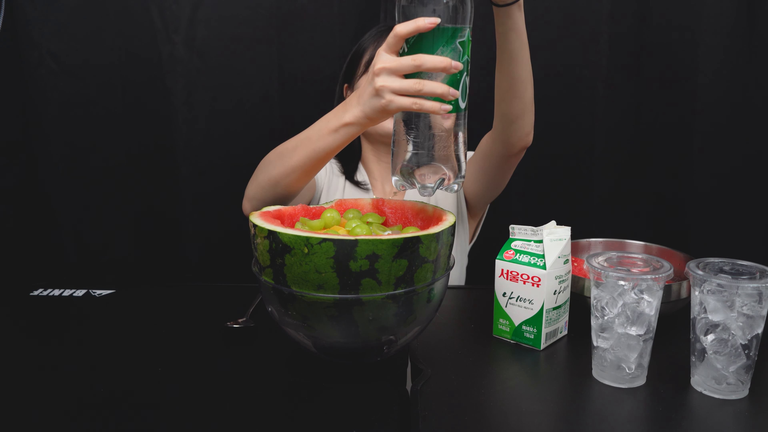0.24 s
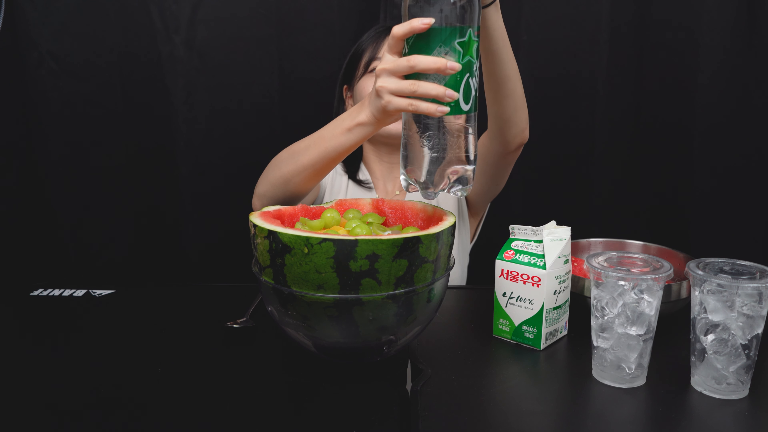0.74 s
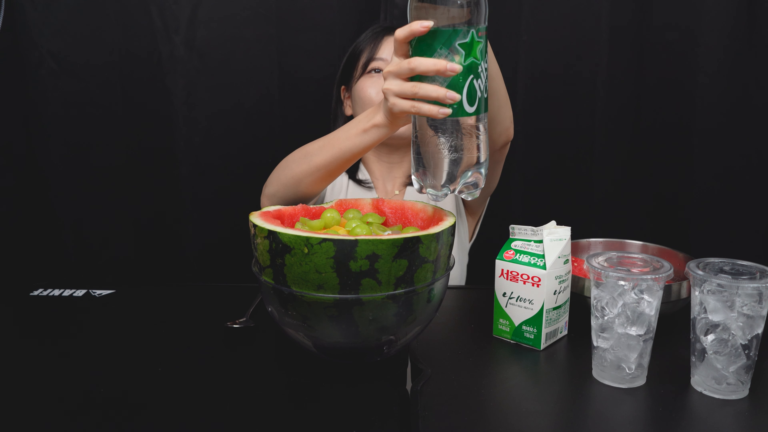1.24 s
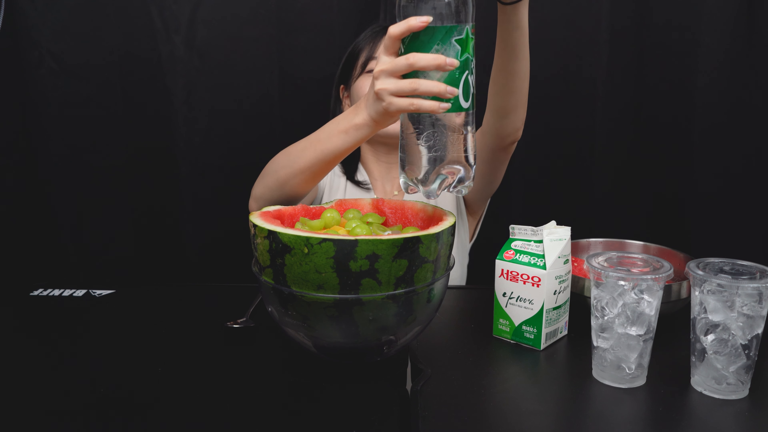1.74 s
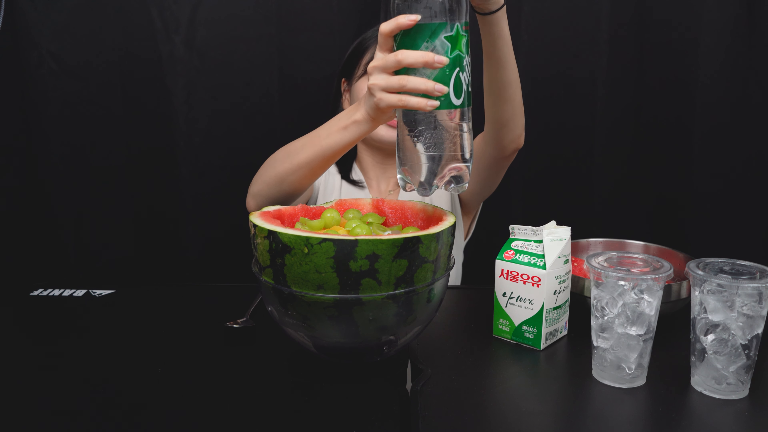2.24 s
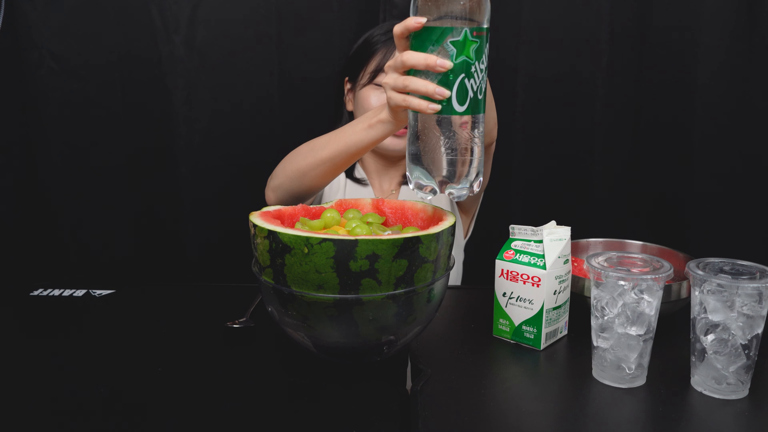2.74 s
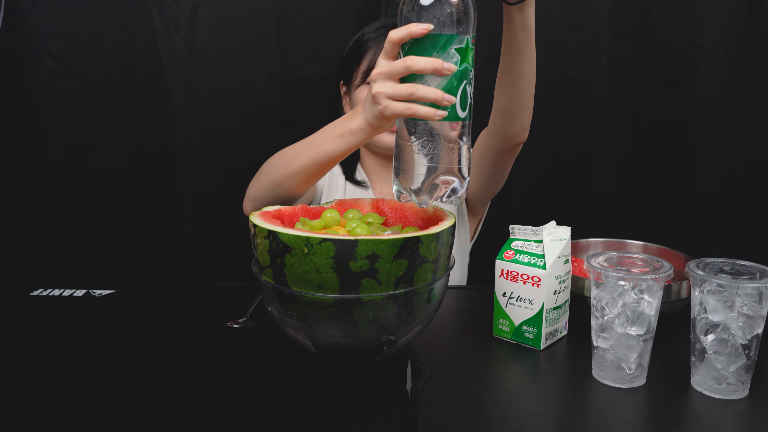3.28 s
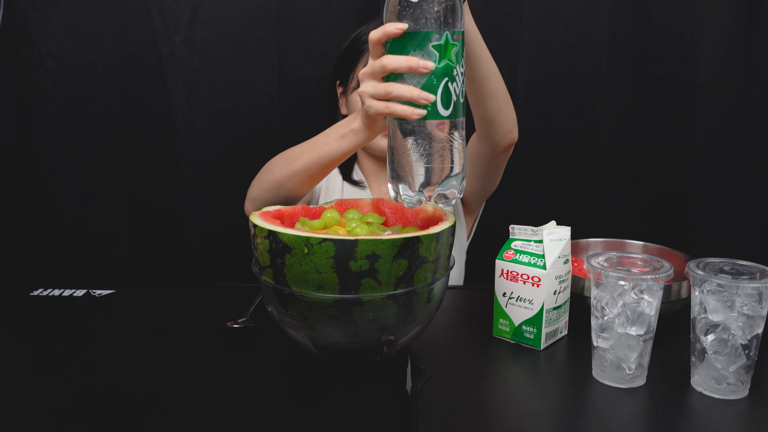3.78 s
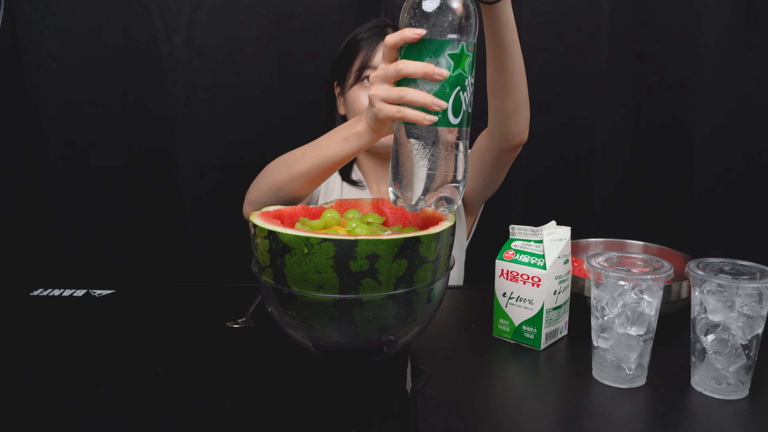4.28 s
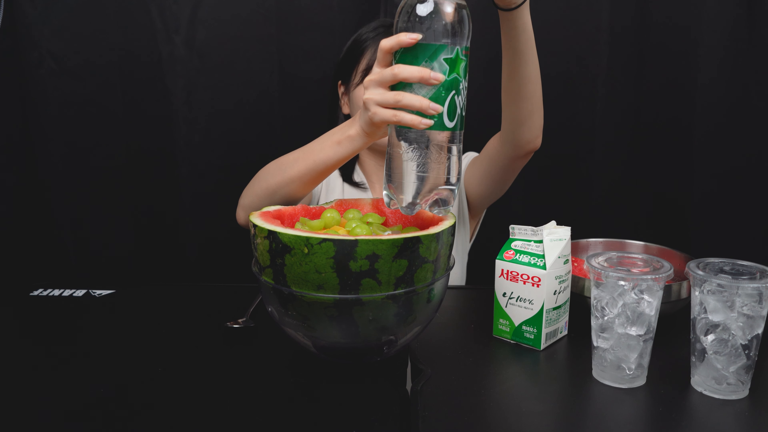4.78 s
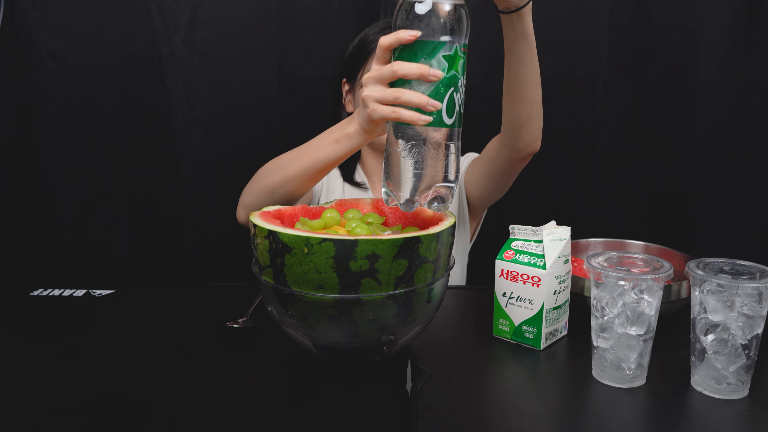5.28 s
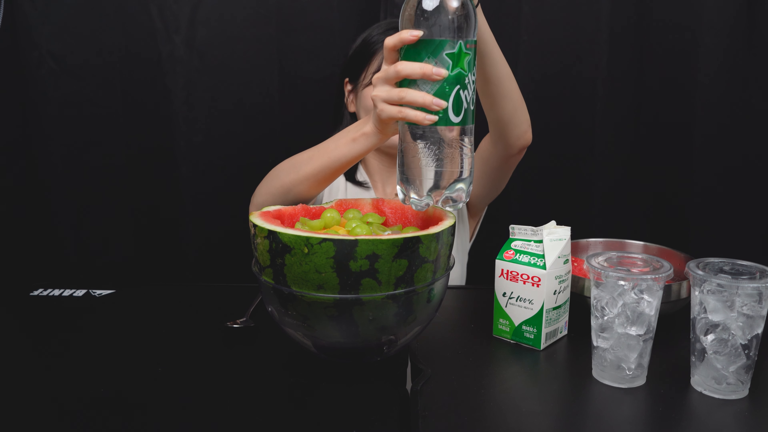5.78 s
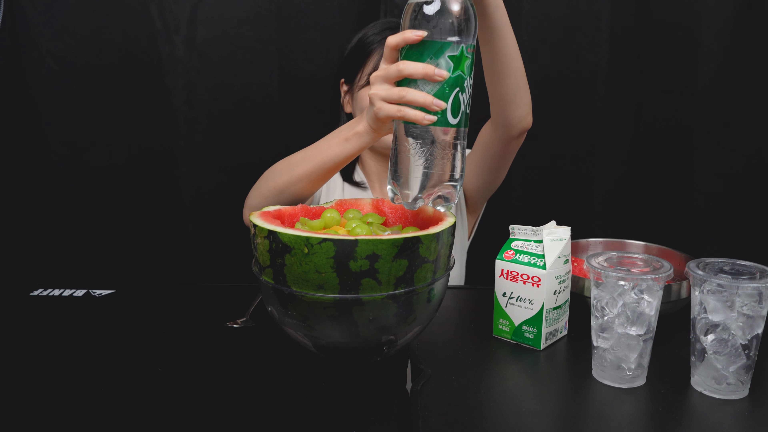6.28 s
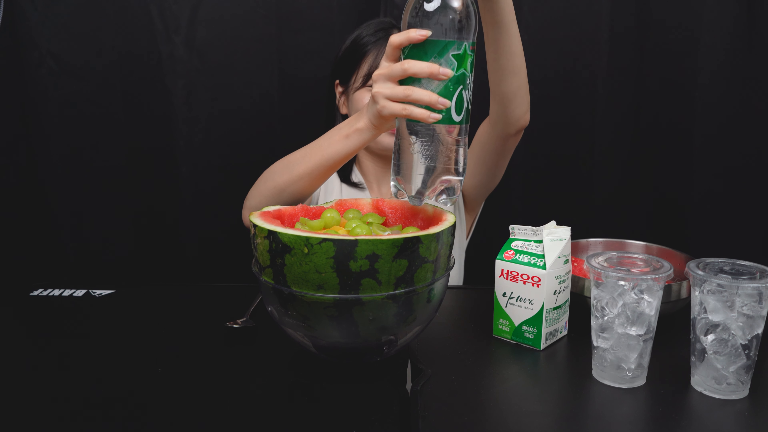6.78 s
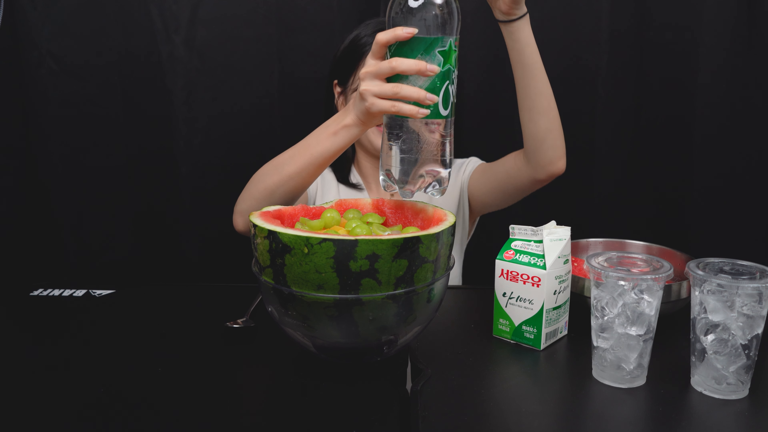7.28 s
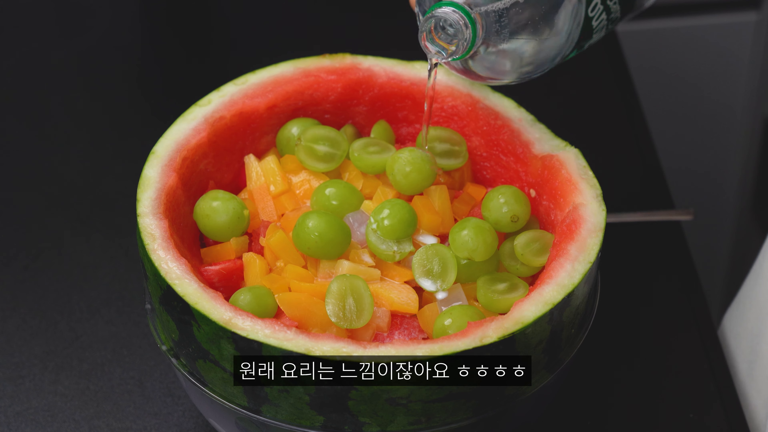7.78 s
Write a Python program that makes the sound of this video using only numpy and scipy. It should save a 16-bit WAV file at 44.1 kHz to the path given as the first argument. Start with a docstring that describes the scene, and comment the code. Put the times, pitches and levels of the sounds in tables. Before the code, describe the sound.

A plastic soda bottle is cracked open close up: a short gas hiss, sharp cap snaps, a dull table thump, then two last plastic clicks.

```python
"""In a quiet room, close to a microphone, a plastic soda bottle is twisted open.
Gas hisses through the thread as turbulent noise whose colour follows the gap; the cap ring snaps
in short bursts that excite resonances; fingers rub in stuttering noise and tap in softer bursts.
Dull bumps ring the modes of the table as decaying sines, and the air in the neck gives a brief
rising note as the cap lifts off. A faint hush of shaped noise lies beneath, with sparse echoes."""
import sys
import numpy as np
from scipy import signal
from scipy.fft import rfft, irfft
from scipy.io import wavfile
from scipy.ndimage import uniform_filter1d

SR = 44100
rng = np.random.default_rng(int(sys.argv[2]) if len(sys.argv) > 2 else 0)


def generate_wav(sig):
    """Save sig (samples, or channels by samples) to the path in sys.argv[1] as 16-bit PCM at SR."""
    pcm = np.round(np.clip(np.atleast_2d(sig).T, -1, 1) * 32767).astype(np.int16)
    wavfile.write(sys.argv[1], SR, pcm)


N = 354123

# Room hush, relative spectrum: (frequency [Hz], density [dB per Hz])
AIR_SPECTRUM = [(15, -38.5), (25, -10), (72, -8.5), (102, -23.5), (137, -7.5), (263, -9.5), (326, -15),
                (439, -3.5), (489, -13), (818, -15), (1230, -15), (1700, -18), (3820, -23.5), (6380, -22),
                (16000, -25.5)]
# Resonances in the hush, before 15 Hz more width and a factor 0.56:
# (frequency [Hz], width [Hz], gain [dB])
HUSH_RESONANCES = [(174, 210, 3.5), (483, 19, 3), (1310, 190, -11)]
# Hiss of opposite sign in left and right: (frequency [Hz], density [dB per Hz])
CHANNEL_SPECTRUM = [(15, -32.5), (25, -5), (175, -6), (309, -5.5), (2410, -2.5), (14800, -3),
                    (16000, -11.5)]
AIR_DB, CHANNEL_DB = -68, -74.5  # rms levels

# Decay of the room's echoes: (frequency [Hz], t60 [s])
ROOM_DECAY = [(250, 0.4), (1000, 0.62), (2000, 0.33), (4000, 0.41), (7000, 0.31), (10000, 0.18),
              (15000, 0.18)]

# Modes of the table, ringing freely: (frequency [Hz], level [dB], t60 [s])
TABLE_MODES = [(39, -3, 1.0), (58, 0, .38), (80, -2, .2), (110, -3, .12), (150, -5, .25), (200, -6, .3),
               (221, -3, .38), (290, -10, .22), (350, -7, .2), (409, -5, .2), (450, -6, .16)]
# Bumps through the table, peak before the low-pass:
# (time [s], peak [dB], favoured pitch [Hz], selectivity [dB per octave squared])
TABLE_BUMPS = [(.211, -44, 90.5, 5.5), (.249, -53.5, 69, 0.5), (1.452, -51, 62, -2), (1.603, -45, 107, 24),
               (1.937, -56, 44, 1.1), (2.091, -46, 66, 2), (2.21, -42, 57, 1.3), (2.432, -42.5, 103, 10.5),
               (2.554, -47.5, 91, 6), (2.602, -43, 101, 15.5), (2.747, -54, 78, 18), (2.897, -44, 60, 1),
               (3.388, -49, 68.6, 30), (3.441, -56, 60, 16), (3.571, -49, 52, 21), (3.677, -51, 126, 4),
               (3.748, -37.5, 119, 9), (3.806, -14.5, 90, 6.5), (3.822, -12.5, 63, 5), (3.87, -13, 203, 7),
               (3.888, -16.5, 80, 7), (3.904, -18, 158, 5), (3.965, -15.5, 111, 10.5),
               (3.974, -17.5, 88.2, 4), (3.975, -26, 39, 19), (3.983, -27.5, 220, 37),
               (4.063, -30.5, 199, 29), (4.11, -38, 149, 21.5), (4.314, -57, 199, 26),
               (4.854, -59, 207, 18), (5.722, -42.5, 392, 5.5), (6.88, -50, 110, 18)]
# Share of the free ring time, and its growth per dB of selectivity: purer bumps are damped less
RING_SHARE, RING_SHARE_PER_DB = 0.26, 0.0231

# Fingers sliding on the bottle: (start [s], rise [s], hold [s], fade [s], level [dB],
# wall resonance [Hz], treble relative to wall [dB])
FINGER_SLIDES = [(0.284, .008, 0.02, 0.025, -62, 4670, -20), (1.201, 0.0047, 0.053, 0.065, -60, 2070, -12),
                 (1.584, 0.015, 0.015, 0.13, -55, 2350, -2.5), (1.72, .02, 0.096, .04, -71.5, 2320, -10),
                 (2.45, .004, 0.021, 0.073, -68, 2240, -13), (2.534, 0.013, 0.037, 0.013, -61.5, 2280, -8),
                 (2.921, .004, .06, .04, -66, 3890, -8.5), (3.053, 0.022, 0.024, 0.24, -62, 2310, 0.5),
                 (3.196, 0.03, 0.13, .08, -69, 2450, 7.5), (3.415, 0.03, .01, 0.046, -73.5, 2480, 9.5),
                 (4.093, 0.029, 0.054, .06, -59, 2090, -2), (6.051, 0.0044, 0.051, .02, -57.5, 3900, -8),
                 (6.179, .02, 0.012, 0.039, -57.5, 3480, 3), (6.31, .035, 0.052, .03, -73.5, 4330, -19),
                 (6.4, 0.032, .025, .055, -62, 3550, -20), (6.915, 0.016, 0.014, 0.029, -44, 2660, -27),
                 (7.241, 0.0028, .006, 0.039, -63, 3540, -18.5),
                 (7.818, 0.0075, .01, .05, -70, 6100, -18.5)]
SLIDE_EDGE_DB = -20  # relative level at the start of the rise and the end of the fade

# Fingertips tapping the bottle wall: (time [s], peak [dB], centre [Hz])
FINGER_TAPS = [(1.257, -46.5, 1320), (1.585, -47, 1500), (1.453, -35, 797), (2.096, -39, 816),
               (2.111, -26, 1100), (2.156, -42.5, 743), (2.209, -33, 778), (2.433, -32.5, 767),
               (2.892, -32, 1300), (2.907, -26.5, 830), (3.807, -33, 980), (3.826, -30, 762),
               (3.88, -33.5, 743), (3.888, -40, 720), (3.9, -44, 746), (3.963, -40.5, 977),
               (5.991, -44, 1560), (7.205, -49, 1614)]
TAP_ABOVE_DB, TAP_BELOW_DB = -7, 4  # slopes above and below the centre, dB per octave
TAP_MS, TAP_RATTLE_DB = .55, -27  # time scale; splinter peaks come at half of it
TAP_CAP_SHARE = .2  # a tap on the wall hardly rings the cap

# The loose cap knocks and rings the air in the neck: (time [s], level [dB])
CAP_KNOCKS = [(6.844, -34), (6.888, -45), (6.957, -55.5)]
NECK_S, NECK_LENGTH_S, NECK_T60_S = 6.846, .17, 0.13
NECK_SHUT_HZ, NECK_OPEN_HZ = 317, 520
NECK_LIFT_S, NECK_GLIDE_S = .065, 0.018  # midpoint and time scale of the glide

# Snaps of the cap and its ring: (time [s], peak [dB], centre [Hz],
# slope above it [dB per octave], slope below it [dB per octave])
CAP_CRACKS = [(0.411, -27, 2820, -5, 6), (1.268, -29.5, 2280, 0, 9), (1.332, -32.5, 2090, -1, 11),
              (1.349, -35.5, 2150, -1.5, 4), (1.612, -28, 2630, 5, 0), (1.539, -50, 3000, -11.5, 7),
              (1.64, -48, 5500, 1, 6), (1.673, -40, 3420, -14, 18), (1.826, -46.5, 3014, -13.5, 8),
              (2.552, -46, 2400, -21, 10.1), (2.596, -8.5, 2190, 3.5, 12), (2.603, 2, 2013, 0, 15),
              (2.74, -5, 3770, -2, 14), (3.643, -8, 5280, -5, 9.5), (3.752, -4.5, 2150, -3, 7.5),
              (3.775, -15, 4280, -14, 9.5), (3.795, -14.5, 3300, -3.5, 13), (3.837, -19, 2250, -3, 9),
              (3.922, -16.5, 2040, -2.2, 16.5), (5.584, -42, 2147, -7, 3), (5.609, -12.5, 2150, -1.5, 12.5),
              (5.637, -3, 3200, -5, 14), (5.672, -8.5, 3240, -3.5, 8.5), (5.7195, -0.5, 3000, -0.5, 0),
              (5.722, 3.8, 2030, -8.5, 15.5), (5.722, -4.5, 1050, -12, 9), (5.872, -23.5, 3480, -11, 9.5),
              (6.035, -29, 4390, -11.5, 10.5), (6.066, -38, 2270, -9, 9), (6.076, -38.5, 2280, -4.5, 7),
              (6.089, -34, 4250, -16, 3), (6.19, -42, 3680, -6.5, -8), (6.841, -20.5, 2980, -10, 4.5),
              (6.845, 3, 2930, -7.5, 4.5), (6.8755, -10.5, 3560, -9.5, 1), (6.886, -21.5, 1910, -11, 2),
              (6.894, -33, 3620, -9, 10), (6.9485, -33, 3500, -21, 6), (6.9578, -31, 2000, -11, 1),
              (7.183, -51, 4130, -5, 12), (7.246, -45, 3640, -17.5, 13)]
# Soft resonances of the cap: (frequency [Hz], width [Hz], gain [dB])
CAP_RESONANCES = [(2170, 200, 6.5), (2800, 300, -4.5), (3560, 470, -12.5), (6900, 1800, 2)]
CRACK_MS, CRACK_RATTLE_DB, RATTLE_S = .6, -29, 0.013  # RATTLE_S: decay to 1/e
RATTLE_HZ, RATTLE_DB_PER_OCTAVE = 2050, -13  # cracks near the cap's main ring rattle it most
THINNING_DB = 0.2  # the bass falls ever faster below the centre, dB per octave squared

# Gas jet over time: (time [s], level [dB], gap opening [0-1])
JET_COURSE = [(0.335, -53, 0.2), (0.409, -39, 0.14), (0.521, -21, 0.44), (0.667, -21.5, 0.2),
              (0.795, -19, 0.61), (0.905, -20, 0.97), (1.017, -18, 1), (1.089, -23, 0.77),
              (1.201, -46, 0.2), (1.3, -87, 1)]
# Jet through a narrow gap, then a wide gap: (frequency [Hz], density [dB per Hz])
NARROW_SPECTRUM = [(35, -61), (60, -34), (346, -26), (607, -21), (732, -20.5), (1950, -13), (2140, -17.5),
                   (2650, -1.5), (3120, 0.5), (3850, -3.5), (6280, -7), (8920, -3), (11300, -5.5),
                   (13300, -2.5), (16000, -9)]
WIDE_SPECTRUM = [(35, -59), (60, -25.5), (168, -27), (363, -24), (398, -31.5), (651, -24), (1200, -20.5),
                 (1910, -14), (2580, -12), (3940, -7), (6280, -6), (7570, -5), (11500, -7), (14200, -4),
                 (16000, -10)]
THREAD_LOW_HZ, THREAD_UPPER_HZ, THREAD_HIGH_HZ = 2950, 9900, 13000
THREAD_HIGH_CLIMB_HZ = 1400  # the highest resonance climbs as the gap opens
THREAD_NARROW_HZ, THREAD_WIDE_HZ = 9050, 7750  # the middle resonance sinks as the gap opens

SHELF_HZ, EDGE_HZ = 15850, 16900  # start of the top-treble step, and the band limit


def gain_of(db):
    """Decibel law: twenty decibels are a tenfold amplitude."""
    return 10 ** (np.asarray(db) / 20)


def evened(x):
    """Normalisation to an rms of 1."""
    return x / np.sqrt(np.mean(x ** 2) + 1e-20)


def read(points, hz):
    """Interpolation along a logarithmic frequency axis."""
    f, value = np.transpose(points)
    return np.interp(np.log(hz + 1), np.log(f + 1), value)


def add(mix, s, sound):
    """Superposition: the sound is summed into the mix from s seconds on."""
    part = mix[round(s * SR):][:len(sound)]
    part += sound[:len(part)]


def resonate(x, hz, width):
    """Resonance of gain 1 by heterodyning: hz is shifted to zero, smoothed and shifted back."""
    turn = np.exp(2j * np.pi * np.cumsum(hz * np.ones(len(x))) / SR)
    r = np.exp(-np.pi * width / SR)
    smoothed = signal.lfilter([1 - r], [1, -r], x / turn + 1e-18)
    return 2 * (turn * smoothed).real


def noise(spectrum, count):
    """Spectral shaping: steady noise of rms 1 with the given spectrum."""
    white = rfft(rng.standard_normal(count))
    colour_db = read(spectrum, np.fft.rfftfreq(count, 1 / SR))
    return evened(irfft(white * gain_of(colour_db), count))


def rings(modes, count):
    """Modal superposition: the exponentially dying sines of a struck body."""
    t = np.arange(count) / SR
    return sum(gain_of(db - 60 * t / t60) * np.sin(2 * np.pi * hz * t) for hz, db, t60 in modes)


def played(rows):
    """Piecewise-linear interpolation: start time and the columns of a curve, sample by sample."""
    s, *columns = np.transpose(rows)
    t = np.arange(s[0], s[-1], 1 / SR)
    return s[0], [np.interp(t, s, c) for c in columns]


def hush():
    """Broadband background noise: slowly wavering room air and a hiss opposed between channels."""
    air = noise(AIR_SPECTRUM, count=N)
    air += sum(0.56 * gain_of(db) * resonate(air, hz, width + 15) for hz, width, db in HUSH_RESONANCES)
    waver = evened(uniform_filter1d(rng.standard_normal(N), size=5000))
    apart = gain_of(CHANNEL_DB) * noise(CHANNEL_SPECTRUM, count=N)
    return gain_of(AIR_DB + .6 * waver) * evened(air) + np.array([apart, -apart])


def room(x):
    """Reverberation: sparse echoes of random sign, each band decaying at its own rate."""
    echoes = np.zeros(SR // 2)
    at = np.arange(150, len(echoes) - 20, 20)
    at = at + rng.integers(0, 20, len(at))
    echoes[at] = rng.choice([-1., 1.], len(at))
    hz, t, z = signal.stft(echoes, SR, nperseg=256)
    decay = gain_of(-60 * t / read(ROOM_DECAY, hz)[:, None])
    tail = signal.istft(z * decay, SR, nperseg=256)[1]
    # the small bottle sends little bass round the room
    tail = signal.lfilter(*signal.butter(2, 1300, "high", fs=SR), tail)
    return signal.fftconvolve(x, tail / np.linalg.norm(tail))[:N]


def bumps():
    """Modal excitation: a soft push favours modes near one pitch, and a resting arm damps them."""
    out = np.zeros(N)
    t = np.arange(SR * 3 // 4) / SR
    for s, db, spot_hz, choosy_db in TABLE_BUMPS:
        purity = abs(choosy_db)
        share = RING_SHARE + RING_SHARE_PER_DB * purity
        modes = [(hz, d - choosy_db * np.log2(hz / spot_hz) ** 2, t60 * share)
                 for hz, d, t60 in TABLE_MODES]
        push_s = .0018 + 0.00014 * purity  # purer bumps come from slower pushes
        swell = 1.5 + 0.4 * np.exp(-purity / 9) - np.exp(-(t / push_s) ** 2)
        sound = swell * rings(modes, count=len(t))
        add(out, s, gain_of(db) * sound / abs(sound).max())
    # the heavy top passes little treble
    return signal.lfilter(*signal.butter(2, 650, fs=SR), out)


def slides():
    """Stick-slip friction: skin stutters in clumpy noise through a wall resonance, with a rustle."""
    out = np.zeros(N)
    t = np.arange(SR // 2) / SR
    for s, rise, hold, fade, level_db, wall_hz, treble_db in FINGER_SLIDES:
        grains = rng.standard_normal((3, len(t)))
        corners = np.cumsum([0, rise, hold, fade])
        db = level_db + SLIDE_EDGE_DB * np.interp(t, corners, [1, 0, 0, 1])
        stutter = gain_of(2.9 * evened(uniform_filter1d(grains[0], size=120)))
        wide = resonate(resonate(grains[1], wall_hz, 3200), wall_hz, 2800)
        wall = wide + 1.8 * resonate(wide, wall_hz, 300)
        rustle = signal.lfilter(*signal.butter(2, [5500, 11000], "band", fs=SR), grains[2])
        sound = evened(wall) + gain_of(treble_db) * evened(rustle)
        add(out, s, gain_of(db) * evened(stutter) * sound * (t < corners[-1]))
    return out


def neck():
    """Cavity resonance: the air's hollow note rises with the opening; each knock renews it."""
    t = np.arange(0, NECK_LENGTH_S, 1 / SR)
    opening = 1 / (1 + np.exp((NECK_LIFT_S - t) / NECK_GLIDE_S))
    hz = NECK_SHUT_HZ + (NECK_OPEN_HZ - NECK_SHUT_HZ) * opening
    level = np.zeros(len(t))
    for s, db in CAP_KNOCKS:
        since = np.maximum(t + NECK_S - s, 0)
        level += gain_of(db - 60 * since / NECK_T60_S) * np.minimum(since * 500, 1)  # 2 ms onset
    puff = rng.standard_normal(len(t))
    breath = evened(resonate(resonate(puff, hz, 90), hz, 90))
    note = np.sin(2 * np.pi * np.cumsum(hz) / SR) + 1.2 * breath
    out = np.zeros(N)
    add(out, NECK_S, level * note)
    return out


def snap(centre_hz, above_db, below_db, ms, rattle_db, cap_share):
    """Impulsive excitation: a sharp break, gritty splinters and a short rattle ring the cap."""
    t = np.arange(4096) / SR
    u = t * 1000 / ms
    splinters = u * np.exp(-2 * u)
    rattle = gain_of(rattle_db) * np.exp(-t / RATTLE_S)
    burst = rng.standard_normal(len(t)) * (splinters + rattle)
    burst[round(ms * SR / 2000)] += 1.3  # the break itself, at the height of the splinters
    octaves = np.log2((np.fft.rfftfreq(len(t), 1 / SR) + 1) / centre_hz)
    colour_db = np.where(octaves > 0, above_db, below_db - THINNING_DB * octaves) * octaves
    cepstrum = irfft(np.log(gain_of(colour_db) + 1e-4))
    cepstrum[1:len(t) // 2] *= 2  # folding the cepstrum makes the colour causal
    cepstrum[len(t) // 2 + 1:] = 0
    tick = irfft(rfft(burst) * np.exp(rfft(cepstrum)))
    tick += cap_share * sum(gain_of(db) * resonate(tick, hz, width) for hz, width, db in CAP_RESONANCES)
    return tick / abs(tick).max()


def taps():
    """Impact: fingertips excite the bottle wall and hardly ring the cap."""
    out = np.zeros(N)
    for s, db, centre_hz in FINGER_TAPS:
        tick = snap(centre_hz, TAP_ABOVE_DB, TAP_BELOW_DB, TAP_MS, TAP_RATTLE_DB, TAP_CAP_SHARE)
        add(out, s, gain_of(db) * tick)
    return out


def cracks():
    """Fracture: the cap and its ring snap, rattling most near the cap's main ring."""
    out = np.zeros(N)
    for s, db, centre_hz, above_db, below_db in CAP_CRACKS:
        distance = abs(np.log2(centre_hz / RATTLE_HZ))
        rattle_db = CRACK_RATTLE_DB + RATTLE_DB_PER_OCTAVE * distance
        add(out, s, gain_of(db) * snap(centre_hz, above_db, below_db, CRACK_MS, rattle_db, cap_share=1))
    return out


def jet():
    """Turbulence: gas noise shifts colour as the gap opens, and the thread lends soft resonances."""
    s, (db, gap) = played(JET_COURSE)
    n = len(db)
    gas = np.sqrt(1 - gap) * noise(NARROW_SPECTRUM, count=n)
    gas += np.sqrt(gap) * noise(WIDE_SPECTRUM, count=n)
    middle_hz = THREAD_NARROW_HZ + (THREAD_WIDE_HZ - THREAD_NARROW_HZ) * gap
    high_hz = THREAD_HIGH_HZ + THREAD_HIGH_CLIMB_HZ * gap
    thread = 0.51 * (1 - gap) ** 2 * resonate(gas, THREAD_LOW_HZ, 700)
    thread += 0.64 * resonate(gas, middle_hz, 1100)
    thread += 0.19 * resonate(gas, high_hz, 1500)
    thread += .6 * resonate(gas, THREAD_UPPER_HZ, 900)
    gas += thread
    gas += 0.57 * gap * resonate(gas, 1900, 300)  # the neck speaks more as the gap widens
    # the leak paths wander: patches of frequency and time swell and sink
    z = signal.stft(gas, nperseg=512)[2]
    patches = uniform_filter1d(rng.standard_normal(z.shape), size=11, axis=0)
    patches = uniform_filter1d(patches, size=15, axis=1)
    gas = signal.istft(z * gain_of(1.5 * evened(patches)), nperseg=512)[1][:n]
    steady = gas / np.sqrt(uniform_filter1d(gas ** 2, size=3000))
    sputter = evened(uniform_filter1d(rng.standard_normal(n), size=60))  # droplets break the flow
    out = np.zeros(N)
    add(out, s, steady * gain_of(db + 1.6 * sputter))
    return out


def scene():
    """Superposition: the bottle's direct sound, its echoes, the neck, the table and the hush."""
    bottle = jet() + cracks() + taps() + slides()
    echoes = gain_of(-24) * room(bottle)
    return bottle + echoes + neck() + bumps() + hush()


def record(dry):
    """Band limiting and saturation: deep bass is cut, peaks rounded, the top treble stepped down."""
    cut = signal.lfilter(*signal.butter(2, 36, "high", fs=SR), dry)
    rounded = cut / (1 + abs(cut / .95) ** 4) ** .25
    shelf, edge = (signal.firwin(511, hz, window=("kaiser", 14), fs=SR) for hz in (SHELF_HZ, EDGE_HZ))
    stepped = shelf + gain_of(-34) * (edge - shelf)
    return signal.oaconvolve(rounded, stepped[None], "same")


dry = scene()
out = record(dry)
generate_wav(out)
```